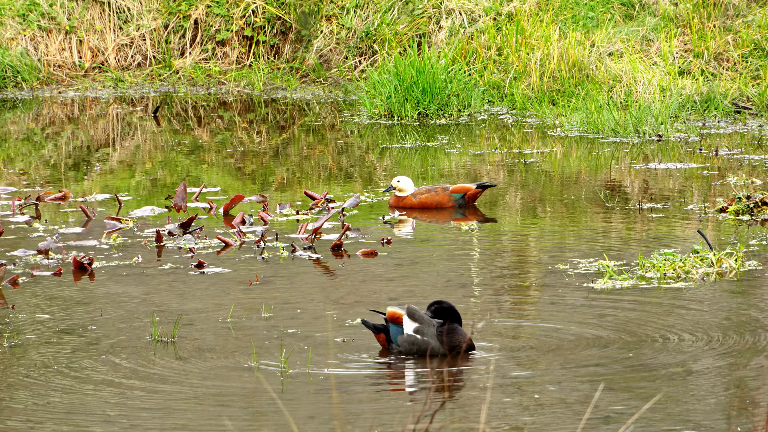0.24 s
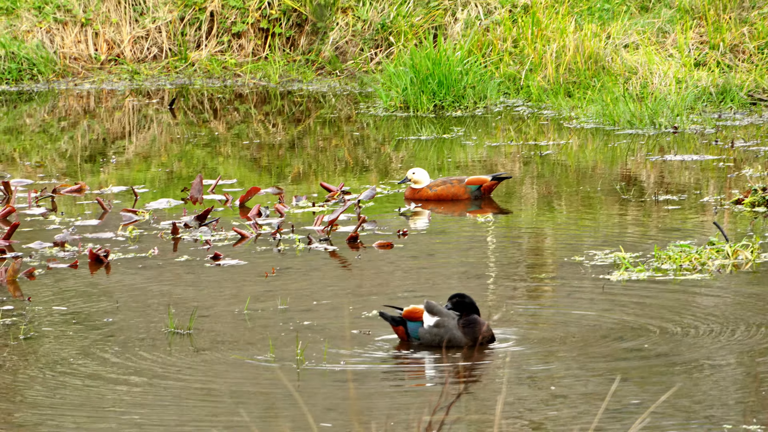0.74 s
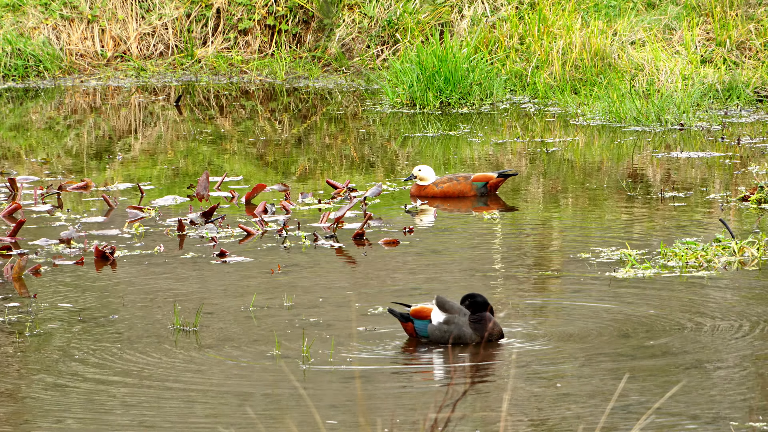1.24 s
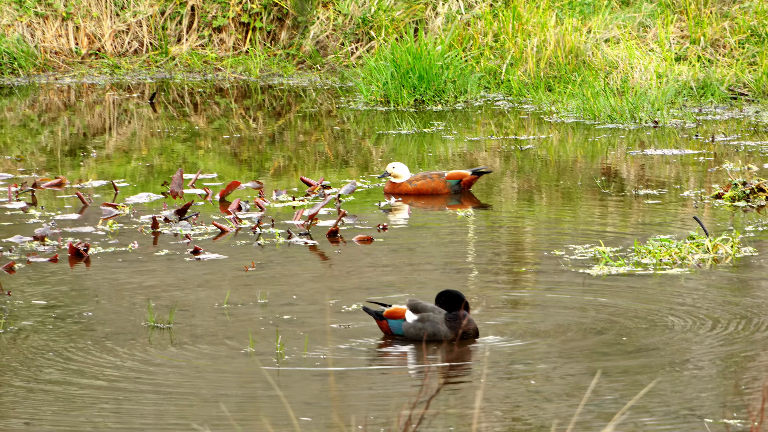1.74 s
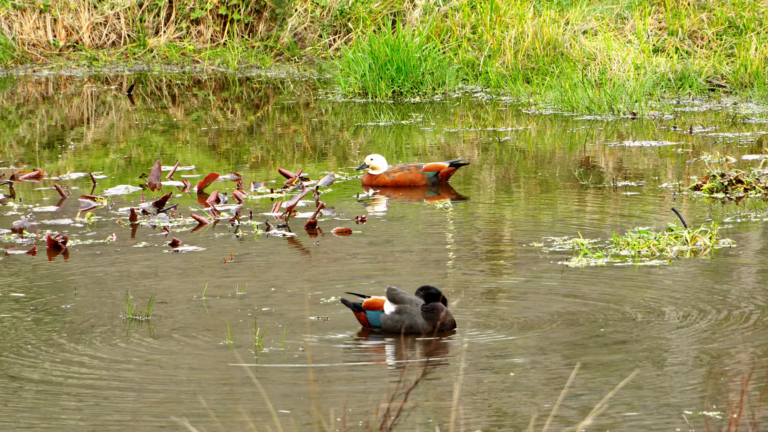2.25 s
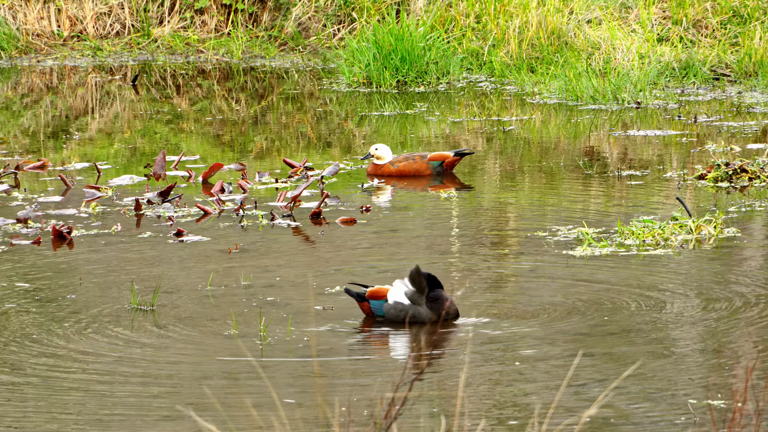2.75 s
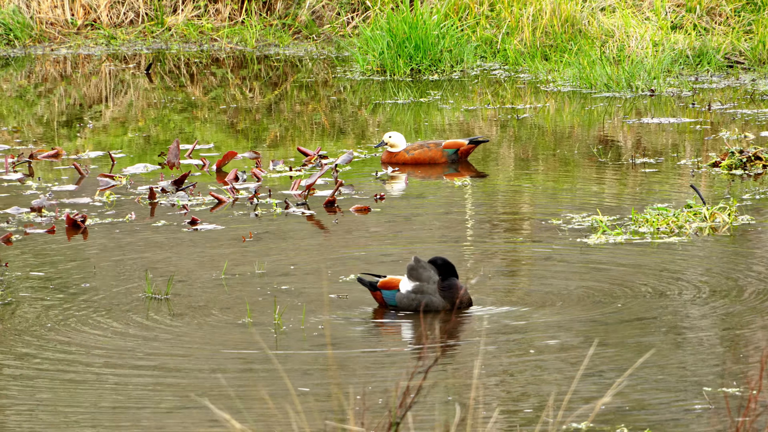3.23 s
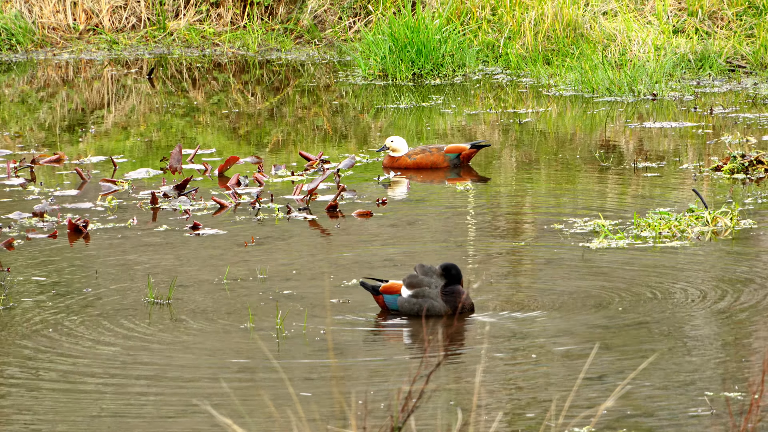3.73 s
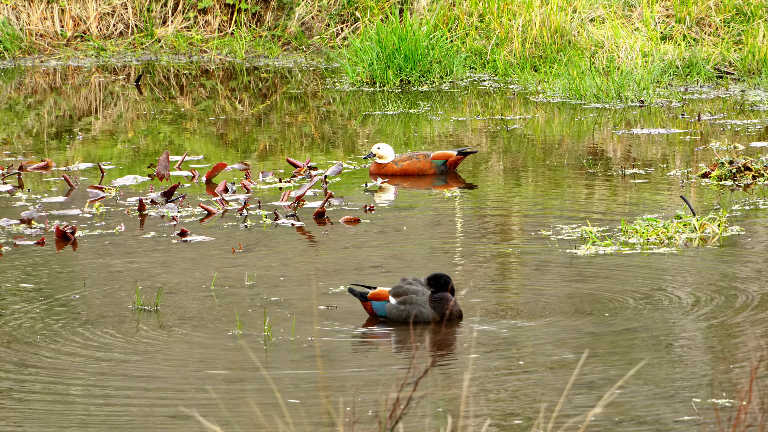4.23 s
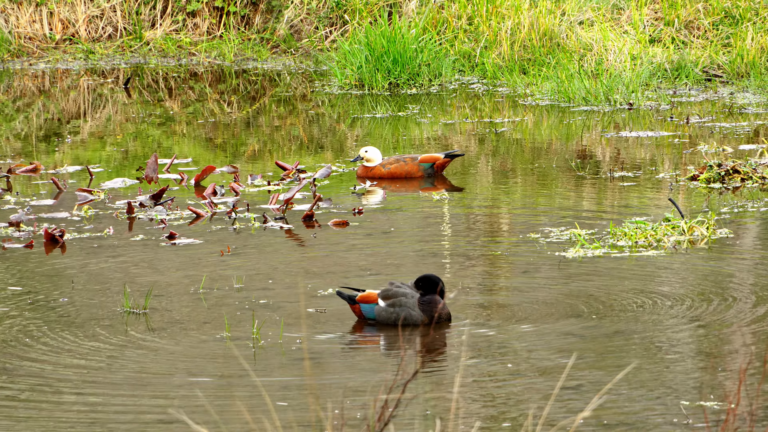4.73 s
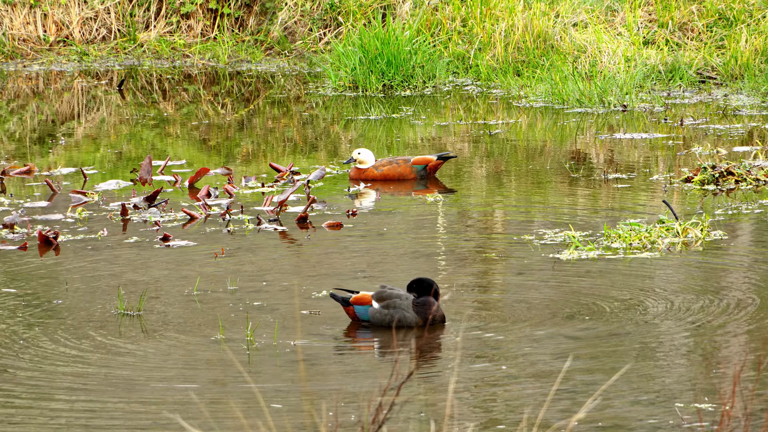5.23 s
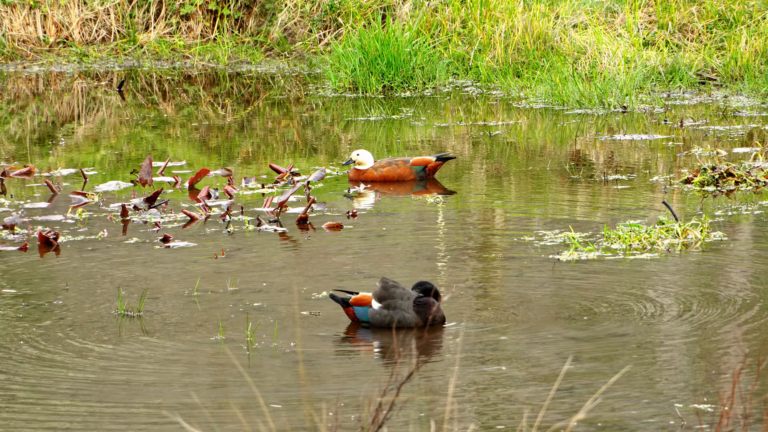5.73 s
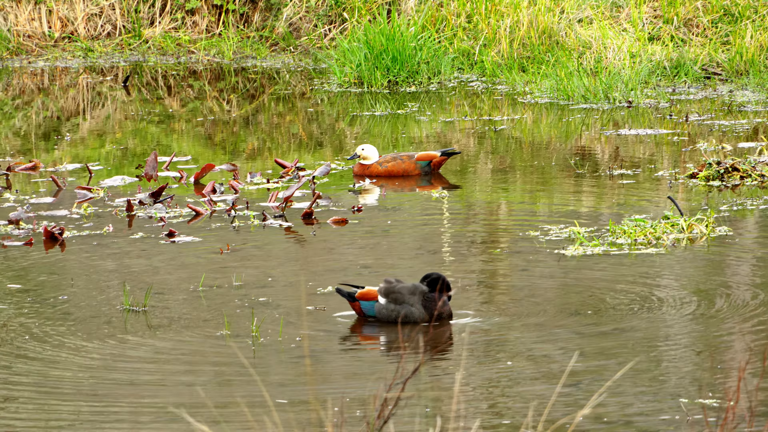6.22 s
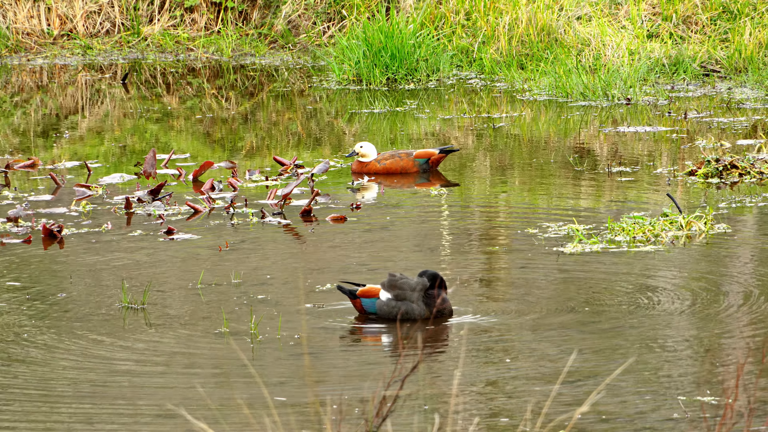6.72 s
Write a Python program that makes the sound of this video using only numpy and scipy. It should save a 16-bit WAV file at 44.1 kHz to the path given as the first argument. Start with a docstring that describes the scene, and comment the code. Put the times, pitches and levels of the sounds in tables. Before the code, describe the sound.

Over faint open-air hiss, a sparse piping note gives way to a buzzy warbling phrase, clear whistles and low bird notes.

```python
"""A whistler and a buzzing warbler sing on the right of a pond, with a lower voice ahead of two microphones.
Piping notes with croaks, thin high calls and a far chorus join them, over soft bumps and a faint wide hiss.
Each bird is a gliding tone, and a buzz is a tone chopped into quick pulses; the croaks stack many partials.
The bush scatters every bird sound into a long ragged tail; the hiss is shaped random noise."""
import sys
import numpy as np
from scipy import signal
from scipy.fft import rfft, irfft, next_fast_len
from scipy.io import wavfile
from scipy.ndimage import uniform_filter1d

SR = 44100
rng = np.random.default_rng(int(sys.argv[2]) if len(sys.argv) > 2 else 0)


def put_to_file(sound):
    """Save the sound as 16-bit audio at rate SR, in the file named by the first command-line argument."""
    columns = np.atleast_2d(sound).T  # one column per channel
    safe = np.clip(columns, -1, 1)
    whole_steps = np.round(safe * 32767)
    wavfile.write(sys.argv[1], SR, whole_steps.astype(np.int16))


N = 307377  # length in samples

# All bird levels are set before the sound is placed left or right and gets its tail.
# Whistler's notes. Each row: start in seconds, length in seconds, first pitch in Hz, last pitch in Hz,
# level at the crest in dB, place of the crest as a share of the length.
WHISTLES = [(4.986, 0.042, 2993, 3015, -37, 0.57), (5.043, 0.053, 2983, 3042, -38.5, 0.24),
            (5.075, 0.061, 3275, 3280, -35.5, 1), (5.183, 0.09, 2460, 2539, -37, 0.65),
            (5.255, 0.076, 1697, 1653, -32, 0.5), (5.454, .06, 1665, 1668, -34.5, .38),
            (5.512, 0.038, 1670, 1610, -29.5, 0.8), (5.664, 0.071, 5000, 5063, -45, 0.65),
            (5.735, 0.055, 5140, 5180, -55, 0.26), (5.756, .075, 2550, 2634, -41.5, 0.86)]
# Warbler's song. Each row: start in seconds, syllable name, crest level in dB.
SONG = [(3.359, "slide", -29.5), (3.444, "zip", -49), (3.51, "rattle", -38.5), (3.648, "rasp", -37),
        (3.725, "climb", -37), (6.337, "slide", -32.5), (6.419, "zip", -51.5), (6.488, "rattle", -42),
        (6.63, "rasp", -40), (6.715, "climb", -40.5), (6.855, "rasp", -41), (6.931, "climb", -44)]
# Outline of each syllable. Each row: length in seconds, first pitch in Hz, last pitch in Hz,
# crest as a share of the length, rise to the crest in dB, fall after it in dB, bend of the glide as a power.
OUTLINES = {"slide": (.08, 3370, 4950, .4, 20, 9, 2.6), "zip": (.045, 8380, 8330, .4, 4, 4, 1),
            "rattle": (.09, 5450, 5040, .6, 11, 5, .45), "rasp": (.068, 4700, 5300, .45, 7, 9, .8),
            "climb": (.088, 5200, 6000, .72, 7, 11, 1.15)}
# Grain of each syllable. Each row: second partial in dB, third partial in dB (both before the beak's colour),
# average pulses per second, pulse depth in dB, pitch swing as a share, pitch waver as a share.
SYLLABLE_GRAINS = {"slide": (-35, -17.5, 80, 11, 0, .005), "zip": (-60, -60, 215, 5.5, .01, .015),
                   "rattle": (-15, -17, 71.5, 16, .027, .034), "rasp": (-10.5, -18, 177, 8.5, .04, .036),
                   "climb": (-11, -29, 68, 28, .065, .042)}
# The beak's colour on overtones. Each row: frequency in Hz, boost in dB.
BEAK = [(6500, -9), (8500, 4.5), (10000, -1), (12500, -10.5), (14500, 10), (16000, -27)]
# Low voice's plain notes. Columns as in WHISTLES.
LOW_NOTES = [(5.03, .03, 1710, 1547, -52, 0.24), (5.17, 0.089, 1358, 1405, -61, 0.4),
             (5.345, 0.072, 1232, 1289, -56, 0.6), (5.833, 0.029, 2633, 1480, -38, 0.25),
             (6.035, 0.049, 970, 983, -67.5, .3), (6.114, 0.016, 1085, 875, -56.5, 0.6),
             (6.164, 0.086, 922, 971, -59, 0.58), (6.258, 0.0174, 2650, 2330, -53.5, .4),
             (6.275, 0.03, 1977, 1353, -48, 0.11), (6.33, 0.074, 965, 899, -58, 0.39),
             (6.61, 0.04, 2685, 1242, -42.5, 0.41), (6.661, 0.026, 2500, 1249, -43.5, 0.45),
             (6.705, 0.014, 2510, 2300, -54.5, .4), (6.722, .015, 1974, 1240, -48, 0.37),
             (6.75, 0.0169, 2650, 1156, -42, .35), (6.058, 0.034, 1493, 1545, -53, .8)]
# Low voice's throbbing notes. Columns as in WHISTLES, then average throbs per second, throb depth in dB.
THROBBING = [(6.088, 0.097, 1557, 1569, -41.5, 0.15, 58, 11.7),
             (6.858, 0.064, 1393, 1427, -47, 0.39, 111, 7.8)]
# Short piping notes. Columns as in WHISTLES.
PIPINGS = [(1.744, 0.048, 2952, 2965, -37, 0.66), (1.868, 0.02, 1440, 1850, -57, 1),
           (2.49, 0.023, 3080, 3150, -55.5, .5), (4.075, 0.048, 2980, 3136, -55.5, 0.39),
           (4.172, 0.0414, 1450, 1623, -56.5, .9), (4.805, 0.038, 3060, 3130, -54.5, .5),
           (5.094, .041, 1354, 1694, -52, 1)]
# Short harsh croaks. Each row: start in seconds, length in seconds, starting pitch in Hz, level in dB,
# throat resonance at the start in Hz, and at the end in Hz.
CROAKS = [(1.881, .028, 364, -55, 1900, 2800), (4.214, .016, 391, -57, 1860, 2620),
          (5.127, .02, 339, -47, 1860, 2570)]
# Thin high calls. Columns as in WHISTLES.
THIN_CALLS = [(1.45, .25, 7850, 7970, -70, 0.69), (6.245, .03, 5040, 5130, -66, .8),
              (6.478, 0.079, 6480, 6520, -55.5, 0.089)]
# Two long falling calls of the thin voice. Each row: time in seconds, pitch in Hz, level in dB.
FALLING_CALLS = [
    [(2.525, 8700, -64), (2.592, 8300, -66), (2.67, 7800, -58.5), (2.726, 7400, -58.5),
     (2.775, 6890, -53.5), (2.86, 6600, -63)],
    [(5.6, 8670, -80), (5.666, 8220, -64), (5.732, 7560, -65.5), (5.798, 6750, -63), (5.864, 6500, -64.5),
     (5.93, 6280, -68)],
]
# Notes of the far chorus. Columns as in WHISTLES.
FAR_CHORUS = [(2.05, 0.23, 2486, 2037, -66, .3), (2.12, 0.14, 2784, 2420, -67, 0.87),
              (2.27, 0.15, 2475, 2034, -60.5, 0.13), (2.33, .07, 2400, 2430, -60, 0.59),
              (2.4, 0.11, 2950, 2780, -63.5, 0.56), (2.44, 0.086, 2675, 2370, -60, .15),
              (2.58, 0.15, 2510, 2597, -61, 0.56), (2.72, 0.22, 2483, 2476, -60, 0.31),
              (4.205, 0.062, 2267, 2270, -60.5, .5), (4.29, .18, 2300, 2287, -73.5, .4),
              (4.46, .1, 3014, 2867, -66, 0.27), (4.53, .22, 2475, 2083, -63.5, 0.33),
              (4.68, .32, 2480, 2254, -66, .3), (4.7, 0.07, 2900, 2770, -65, .6),
              (5.36, 0.055, 2570, 2515, -64, 0.58), (5.56, 0.17, 2590, 2600, -58.5, .5),
              (6.79, 0.074, 1705, 2304, -61, .2)]
# Lowest level of the murmur's whistles over time. Each row: time in seconds, level in dB.
MURMUR_LEVEL = [(0, -90.5), (1.9, -89), (2.3, -70), (2.6, -70.5), (2.9, -73.5), (3.2, -89.5), (4.3, -83.5),
                (4.6, -72.5), (5.1, -67.5), (5.4, -70), (5.7, -70), (6.1, -88.5), (6.97, -68.5)]
# How long echoes from the far slopes last. Each row: frequency in Hz, seconds to fade by 60 dB.
FAR_SLOPES = [(1000, .9), (3000, .75), (6000, .72), (12000, .65)]
# Soft low bumps. Each row: start in seconds, rough peak in dB, pitch in Hz.
BUMPS = [(.57, -65, 55), (1.39, -69, 55), (2.882, -56.5, 55)]
# Colour of the air. Each row: frequency in Hz, relative level in dB per Hz.
AIR_COLOUR = [(12, -41), (20, 0), (47, -20.5), (141, -27), (196, -12), (492, -2), (650, -0.5), (812, -6.5),
              (1590, -6.5), (2480, -7.5), (2930, -7.5), (6210, -16), (9170, -16), (12100, -12.5),
              (15600, -13)]
# Slow level of the air. Each row: time in seconds, change in dB.
AIR_LEVEL = [(0.0, 1.5), (6.97, 2)]
# How alike the air is left and right. Each row: frequency in Hz, likeness (1 is identical).
AIR_LIKENESS = [(60, 0.57), (180, 0.98), (550, 0.3), (1650, 0.33), (4970, 0.0069), (15000, 0.092)]
# Balance of the air. Each row: frequency in Hz, left over right in dB.
AIR_BALANCE = [(60, 0), (180, -1.0), (550, 1), (1650, -1), (4970, -0.5), (15000, -4.5)]


def whistler():
    """Pure gliding tones, each with one swell of level."""
    notes = [note(arch(*row, rise_db=14, fall_db=9)) for row in WHISTLES]
    return placed(notes, lag_us=53, pan_db=-3., wet_db=-5.5, near_db=2.0)


def warbler():
    """A rising slide, then buzzes made of quick pulses."""
    song = []
    for start, name, db in SONG:
        length, from_hz, to_hz, *shape = OUTLINES[name]
        second_db, third_db, *grain = SYLLABLE_GRAINS[name]
        rows = arch(start, length, from_hz, to_hz, db, *shape)
        bloom_db = 45 if name == "slide" else 0
        song.append(note(rows, (second_db, third_db), *grain, bloom_db=bloom_db))
    return placed(song, lag_us=116.7, pan_db=-2.5, wet_db=-0.5, near_db=1.5)


def low_voice():
    """Low tones: plain ones glide fastest at the start, and two others throb in level."""
    swell = {"rise_db": 7.3, "fall_db": 6.6}
    notes = [note(arch(*row, **swell, bend=0.702)) for row in LOW_NOTES]
    for *row, throbs_per_s, depth_db in THROBBING:
        notes.append(note(arch(*row, **swell), per_s=throbs_per_s, depth_db=depth_db))
    return placed(notes, lag_us=9.4, pan_db=-1.5, wet_db=1.5, near_db=4.5)


def piper():
    """Short pure tones and harsh croaks from one place."""
    notes = [note(arch(*row, rise_db=10.3, fall_db=5.1)) for row in PIPINGS]
    croaks = [croak(*row) for row in CROAKS]
    return placed(notes + croaks, lag_us=80, pan_db=-7., wet_db=-6., near_db=0.)


def croak(start, length, hz, db, from_hz, to_hz):
    """A sagging stack of partials, strongest near a throat resonance that climbs."""
    t = np.arange(0, length, 1 / SR)
    throat = from_hz + (to_hz - from_hz) * t / length
    pitch = hz * (1 - .06 * t / length + .05 * wander(len(t), 200))
    turns = np.cumsum(pitch) / SR
    stack = np.zeros(len(t))
    for k in range(2, 11):
        stack += np.exp(-((k * hz - throat) / 550) ** 2) * np.cos(2 * np.pi * k * turns)
    return start, gain_of(db) * evened(stack) * signal.windows.tukey(len(t), .5)


def thin_voice():
    """High, slightly unsteady tones: short calls and two long falling ones."""
    calls = [note(arch(*row, rise_db=11, fall_db=12), waver=0.01) for row in THIN_CALLS]
    falling = [note(rows, waver=0.0091) for rows in FALLING_CALLS]
    return placed(calls + falling, lag_us=-41, pan_db=-1.0, wet_db=-3.)


def far_chorus():
    """Faint wavering tones, together with the murmur behind them."""
    notes = [note(arch(*row, rise_db=2.3, fall_db=4.6), waver=0.012) for row in FAR_CHORUS]
    return placed(notes + murmur(), lag_us=89, pan_db=-6.0, wet_db=-2.5)


def murmur():
    """Many birds too far to tell apart: short falling whistles at random, 70 a second."""
    time, db = np.transpose(MURMUR_LEVEL)
    draws = rng.random((int(70 * N / SR), 4))
    starts = draws[:, 0] * (N / SR - .2)
    pitches = 2200 + 1300 * draws[:, 1]  # Hz
    ends = starts + 0.0398 + 0.0987 * draws[:, 2]
    levels = np.interp(starts, time, db) + 1.9 * draws[:, 3]
    return [note([(start, hz, level), (end, hz * .96, level)], waver=0.013)
            for start, end, hz, level in zip(starts, ends, pitches, levels)]


def bumps():
    """Each bump is about one and a half low cycles that swell and fade."""
    out = np.zeros(N)
    for start, db, hz in BUMPS:
        cycles = np.arange(0, 1.6, hz / SR)
        add(out, start, -gain_of(db) * np.sin(2 * np.pi * cycles) * np.hanning(len(cycles)))
    return out


def air():
    """Distant wash and hiss: random short-time spectra with faint drifting patches."""
    frames, hz = N // 256 + 5, np.fft.rfftfreq(1024, 1 / SR)
    a, b, c, d, patches = rng.standard_normal((frames, 513, 5)).T
    patches = evened(uniform_filter1d(uniform_filter1d(patches, 14, 0), 16, 1))
    left, other = a + 1j * b, c + 1j * d
    same = np.clip(read(AIR_LIKENESS, hz), -1, 1)[:, None]
    right = same * left + np.sqrt(1 - same ** 2) * other  # partly a copy of the left
    balance = gain_of(read(AIR_BALANCE, hz) / 2)[:, None]
    spectra = np.array([left * balance, right / balance])
    spectra *= gain_of(read(AIR_COLOUR, hz)[:, None] + 1.3 * patches)
    hiss = signal.istft(spectra, nperseg=1024, noverlap=768)[1][:, :N]
    level_db = -59.5 + np.interp(np.arange(N) / SR, *np.transpose(AIR_LEVEL))
    return gain_of(level_db) * evened(hiss)


def arch(start, length, from_hz, to_hz, db, crest, rise_db, fall_db, bend=1.):
    """Rows of (s, Hz, dB): the level swells to its crest and fades while the pitch glides."""
    u, crest = np.linspace(0, 1, num=17), np.clip(crest, .05, .95)
    rise = rise_db * (1 - u / crest) ** 2
    fall = fall_db * ((u - crest) / (1 - crest)) ** 2
    under_db = np.where(u < crest, rise, fall)
    return np.transpose([start + length * u, from_hz + (to_hz - from_hz) * u ** bend, db - under_db])


def note(rows, partials_db=(), per_s=80., depth_db=0., swing=0., waver=.002, bloom_db=0.):
    """A tone from the bird's voice organ; a flutter can chop it into pulses and swing its pitch."""
    time, hz, db = np.transpose(rows)
    start, end = time[0], time[-1]
    t = np.arange(start, end, 1 / SR)
    beat = 2 * np.pi * np.cumsum(per_s * (1 + .1 * wander(len(t), 150))) / SR
    pitch = uniform_filter1d(np.interp(t, time, hz), 250, mode="nearest")
    pitch = pitch * (1 + swing * np.sin(beat) + waver * wander(len(t), 363))
    turns = np.cumsum(pitch) / SR
    tone = np.sin(2 * np.pi * turns)
    # with a bloom, overtones open up over the first 60% of the note
    bloom = bloom_db * np.minimum((t - start) / (end - start) - .6, 0)
    for k, partial_db in enumerate(partials_db, start=2):
        overtone_db = partial_db + bloom + read(BEAK, k * pitch)
        tone = tone + gain_of(overtone_db) * np.sin(2 * np.pi * k * turns)
    pulses = evened(gain_of(-depth_db * np.cos(beat) / 2))
    edges = np.sin(np.pi / 2 * np.clip(np.minimum(t - start, end - t) / .006, 0, 1))  # 6 ms fades
    return start, np.sqrt(2) * tone * gain_of(np.interp(t, time, db)) * pulses * edges


def placed(sounds, lag_us, pan_db, wet_db, near_db=-20.0):
    """The left microphone hears it lag_us late; near shrubs scatter a short tail, far slopes a long one."""
    x = np.zeros(N)
    for sound in sounds:
        add(x, *sound)
    tail = scatter(near_db)
    wet = signal.fftconvolve(x[None], tail, axes=1)[:, :N]
    wet = wet * gain_of(1.75 * np.array([wander(N, 23), wander(N, 6.3)]))  # moving leaves stir the tail
    size = next_fast_len(N)
    delay = np.exp(-2j * np.pi * np.fft.rfftfreq(size, 1 / SR) * lag_us / 10 ** 6)
    late = irfft(rfft(x, size) * delay, size)[:N]
    pan = gain_of([[pan_db / 2], [-pan_db / 2]])  # negative leans right
    return pan * (np.array([late, x]) + gain_of(wet_db) * wet)


def scatter(near_db):
    """Two one-second tails of random echoes, which fade at a rate set by pitch and nearness."""
    taps = np.zeros((2, SR))
    at = np.arange(0, SR - 20, 20) + rng.integers(0, 20, (2, (SR - 1) // 20))  # one echo per 20 samples
    echoes = rng.choice([-1., 1.], at.shape) * gain_of(3.6 * rng.standard_normal(at.shape))
    np.put_along_axis(taps, at, echoes, 1)
    taps *= np.arange(SR) > .004 * SR  # no echo in the first 4 ms
    hz, t, spectra = signal.stft(taps, SR, nperseg=256)
    far = gain_of(-60 * t / read(FAR_SLOPES, hz)[:, None])
    near = gain_of(near_db - 60 * t / 0.31)  # shrubs fade by 60 dB in 0.31 s
    tail = signal.istft(spectra * (far + near), SR, nperseg=256)[1]
    return tail / np.linalg.norm(tail, axis=1)[:, None]


def gain_of(db):
    """Turns decibels into gain."""
    return 10 ** (np.asarray(db) / 20)


def evened(x):
    """Scales to an rms (average strength) of 1."""
    return x / np.sqrt(np.mean(x ** 2) + 1e-20)


def read(points, hz):
    """Reads a table of values between its points, on a log-frequency axis."""
    f, value = np.transpose(points)
    return np.interp(np.log(hz + 1), np.log(f + 1), value)


def add(mix, start, sound):
    """Mixes a sound in at start seconds, cutting what runs past the end."""
    part = mix[round(start * SR):][:len(sound)]
    part += sound[:len(part)]


def wander(size, per_s):
    """Smooth random drift of rms 1; a higher per_s makes it quicker."""
    span = max(round(SR / per_s), 1)
    return evened(uniform_filter1d(uniform_filter1d(rng.standard_normal(size), span), span))


def scene():
    """All the birds, then the bumps and the air."""
    birds = whistler() + warbler() + low_voice() + piper() + thin_voice() + far_chorus()
    return birds + bumps() + air()


def record(dry):
    """A steep filter removes everything above 15760 Hz."""
    low_pass = signal.firwin(1023, 15760, window=("kaiser", 10), fs=SR)
    return signal.oaconvolve(dry, low_pass[None], "same")


dry = scene()
out = record(dry)
put_to_file(out)
```